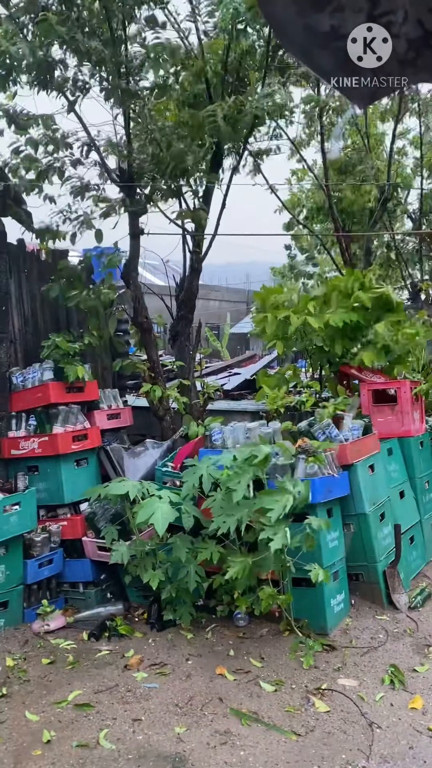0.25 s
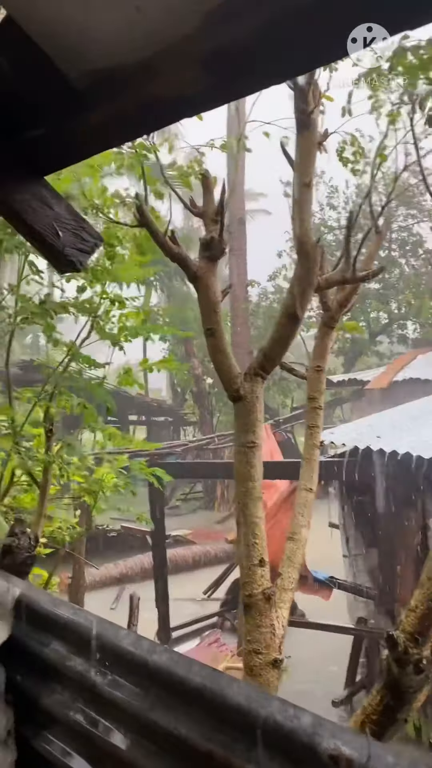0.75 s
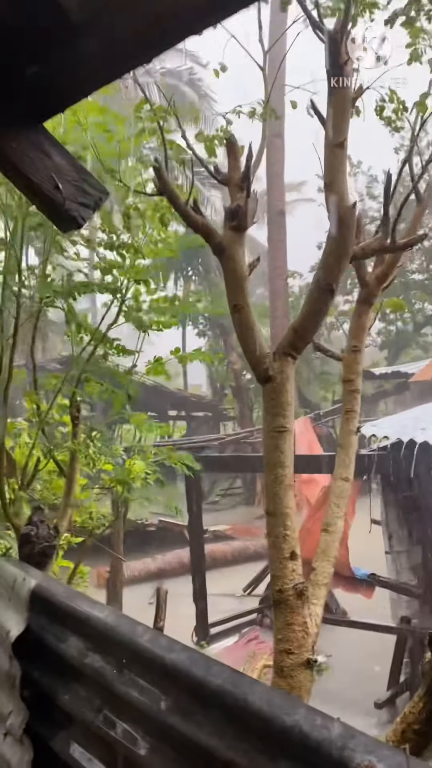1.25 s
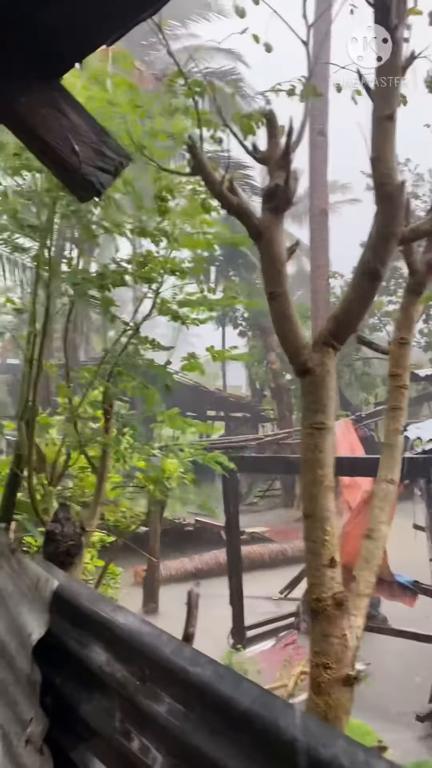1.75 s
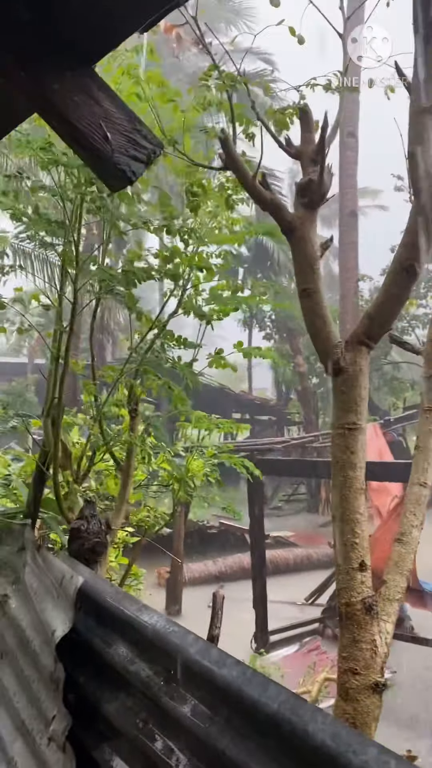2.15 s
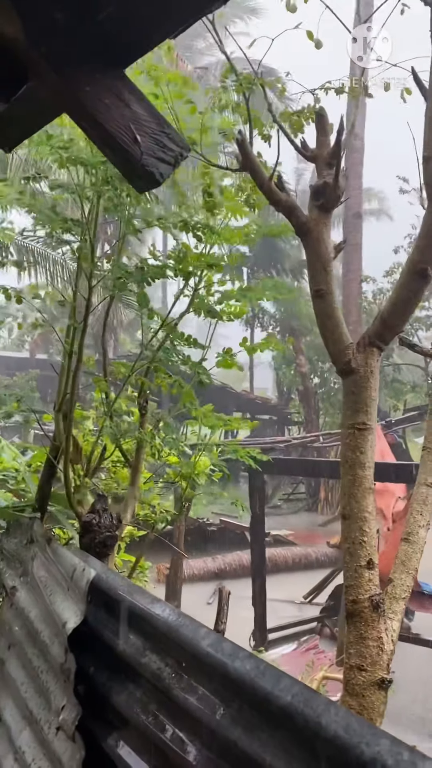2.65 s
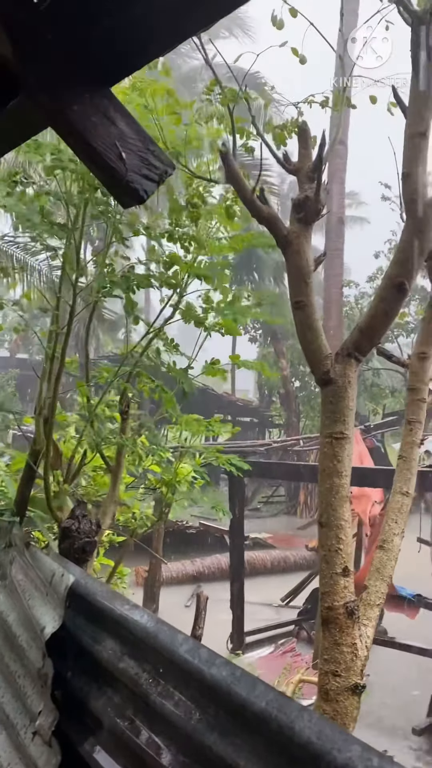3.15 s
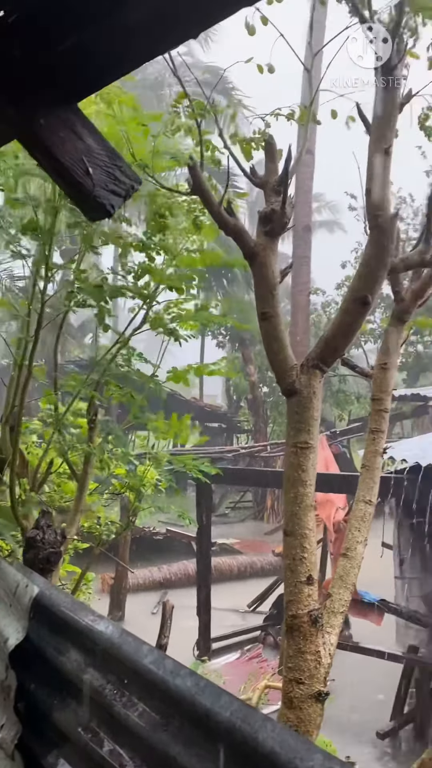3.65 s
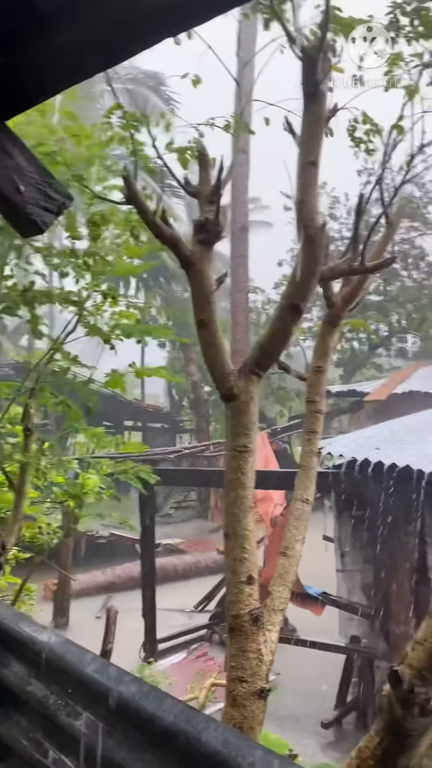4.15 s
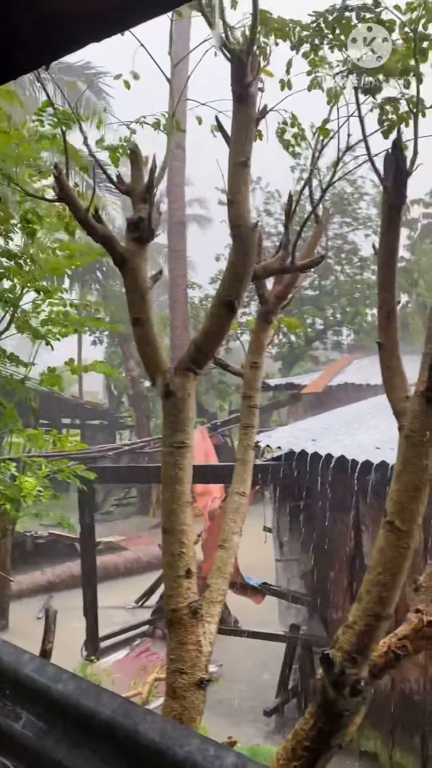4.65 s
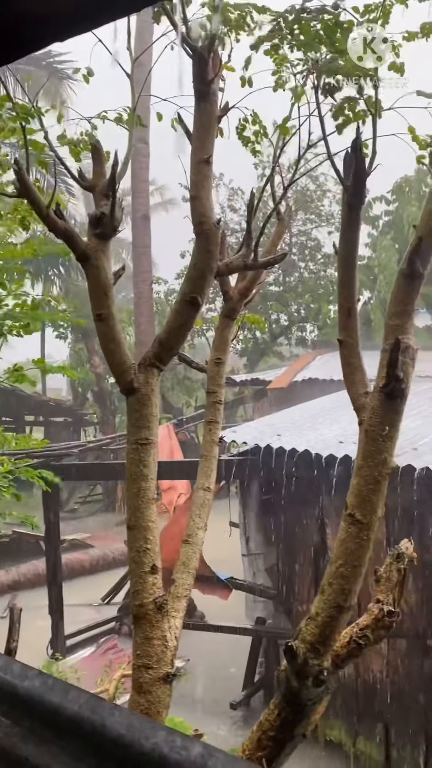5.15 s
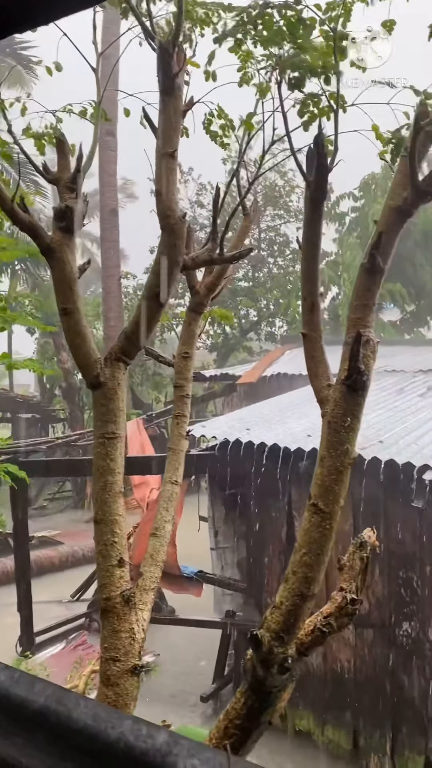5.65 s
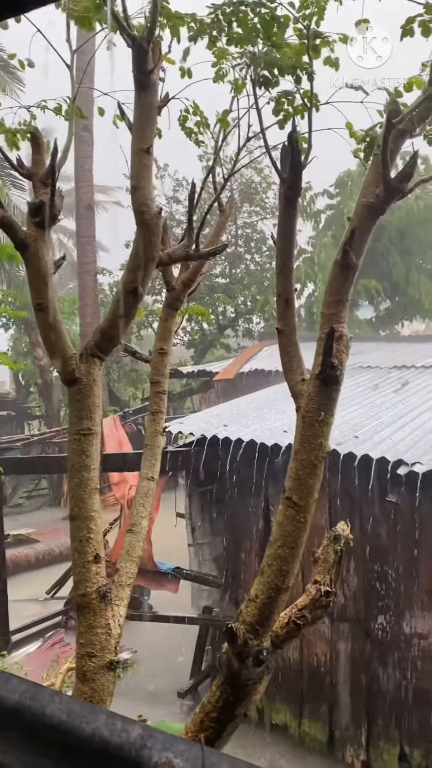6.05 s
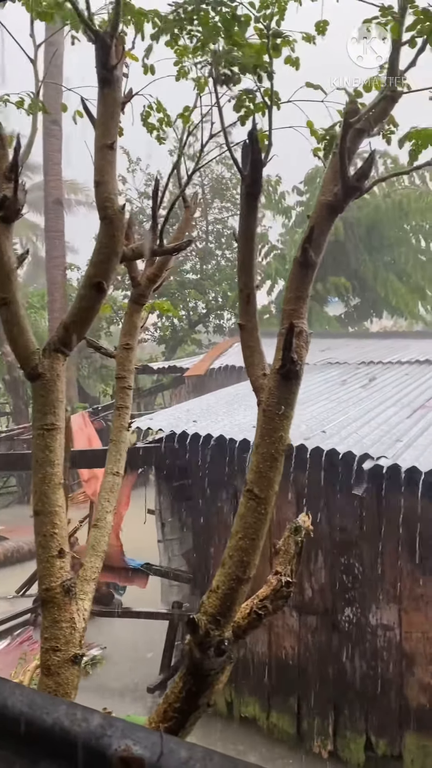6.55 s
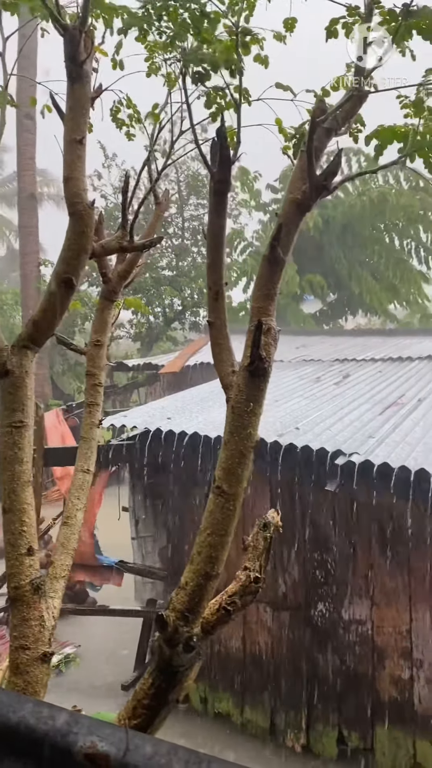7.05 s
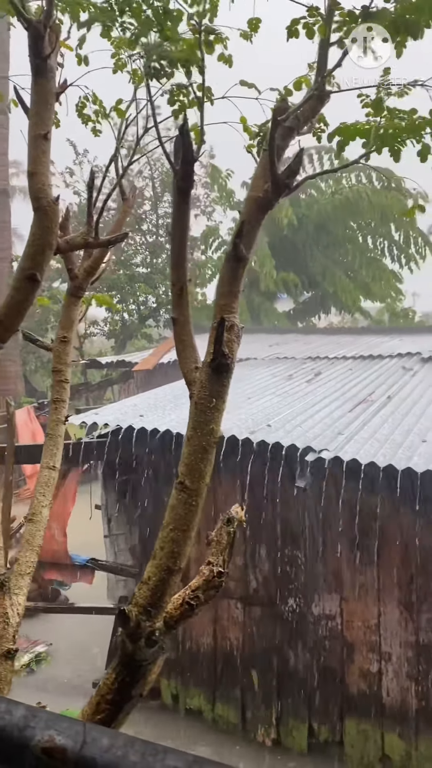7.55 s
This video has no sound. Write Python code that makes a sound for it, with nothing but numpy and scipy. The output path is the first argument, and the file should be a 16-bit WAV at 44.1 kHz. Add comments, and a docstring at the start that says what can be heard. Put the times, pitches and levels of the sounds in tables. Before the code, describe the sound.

A brief wind gust slaps the microphone, then heavy rain drums steadily on corrugated metal roofs, with close drips and light wind bumps.

```python
"""Heavy rain on corrugated metal roofs, heard from under an eave through two close microphone openings.
First a gust shakes and slaps the microphone. The sound drops out for a moment, then the downpour fades
in: countless drops drum on the metal sheets and make them ring, while near ones tick and splash.
Lighter gusts bump the microphone now and then. Near the end, water from the eave plops into a puddle,
where trapped bubbles ring."""
import sys
import numpy as np
from scipy import signal
from scipy.fft import rfft, irfft, next_fast_len
from scipy.io import wavfile
from scipy.ndimage import uniform_filter1d

SR = 44100
rng = np.random.default_rng(int(sys.argv[2]) if len(sys.argv) > 2 else 0)


def waveform_to_disk(signal):
    """Save audio, clipped to [-1, 1], as 16-bit WAV at the path in sys.argv[1]."""
    frames = np.transpose(np.atleast_2d(signal))
    scaled = np.clip(frames, -1, 1) * 32767
    samples = np.round(scaled).astype(np.int16)
    wavfile.write(sys.argv[1], SR, samples)


N = 343098
FFT_SIZE = next_fast_len(N, real=True)
TIME, HZ = np.arange(N) / SR, np.fft.rfftfreq(FFT_SIZE, 1 / SR)


def gain_of(db):
    """Turns decibels into a number to multiply by."""
    return 10 ** (np.asarray(db) / 20)


def evened(x):
    """Scales a sound to an average strength (rms) of 1."""
    return x / np.sqrt(np.mean(x ** 2) + 1e-20)


def curve(table, column=1):
    """Joins the points of a table to give a value for every frequency."""
    columns = np.transpose(table)
    return np.interp(np.log(HZ + 1), np.log(columns[0] + 1), columns[column])


def filtered(x, gain):
    """Turns each frequency up or down by its own gain."""
    return irfft(rfft(x, FFT_SIZE) * gain, FFT_SIZE)[..., :N]


def noise(tone):
    """Noise of strength 1, shaped by a table of frequencies and levels."""
    return evened(filtered(rng.standard_normal(N), gain_of(curve(tone))))


def swell(s, half_s):
    """A smooth rise and fall of height 1 around a time."""
    return np.exp(-((TIME - s) / half_s) ** 2)


def add(mix, s, sound):
    """Mixes a sound in at a time."""
    part = mix[max(round(s * SR), 0):][:len(sound)]
    part += sound[:len(part)]


def eddies(tone, smooth_s):
    """Swirling air: noise with its strength partly levelled, so that a push swells it smoothly."""
    swirl = noise(tone)
    power = filtered(swirl ** 2, np.exp(-(np.pi * HZ * smooth_s) ** 2))
    return evened(swirl / np.sqrt(abs(power) + 0.15))


# pushes of the first gust: (time [s], rumble level [dB], rasp level [dB], half length [s])
PUSHES = [(0.0, -21, -26, 0.0093), (0.048, -31, -27, 0.0089), (0.07, -15, -23, 0.019),
          (0.091, -26, -17, 0.011), (0.119, -19, -26.5, 0.02), (0.169, -36, -20.5, 0.01),
          (0.202, -23, -19.5, 0.019)]
def wind_strength(steady_db, column):
    """Each push swells and dies over a steady flow; the column picks rumble or rasp."""
    return gain_of(steady_db) + sum(gain_of(push[column]) * swell(push[0], push[-1]) for push in PUSHES)


# how alike the left and right channels sound at each frequency, and how far the left leads:
# (frequency [Hz], likeness [0-1], head start of the left [radians])
LIKENESS = [(50, 0.85, 0), (160, 0.76, 0), (300, 0.92, 0), (700, 0.78, -0.1), (1300, 0.87, 0),
            (2000, 0.85, 0.1), (2700, 0.55, 0.9), (4200, 0.52, 0.95), (5000, 0.6, 0.25), (5600, 0.68, 0.65),
            (6400, 0.68, 2.1), (7400, 0.88, 3.14), (10300, 0.78, 6.28), (13500, 0.85, 9.42),
            (15700, 0.55, 12.1)]
# how much louder the left channel is: (frequency [Hz], left minus right [dB])
BALANCE = [(60, 2.5), (150, -0.5), (380, -1.0), (950, -1.5), (2380, -0.5), (5980, 0), (15000, 0.5)]
def two_channels(direct, left, right):
    """Both channels share the direct sound, one a little ahead; scattered sound differs in each."""
    likeness, head_start = curve(LIKENESS), curve(LIKENESS, column=2)
    side = np.array([[0.5], [-0.5]])
    shared = np.sqrt(likeness) * rfft(direct, FFT_SIZE) * np.exp(1j * side * head_start)
    scattered = np.sqrt(1 - likeness) * rfft([left, right], FFT_SIZE)
    return irfft((shared + scattered) * gain_of(side * curve(BALANCE)), FFT_SIZE)[:, :N]


# the wind's deep rumble: (frequency [Hz], relative level [dB])
RUMBLE_TONE = [(15, -11.5), (50, 3), (100, -1.5), (170, -5), (300, -14), (1000, -68)]
# the wind's throaty rasp: (frequency [Hz], relative level [dB])
RASP_TONE = [(60, -27), (150, -9), (230, -0.5), (380, 0.5), (520, -4), (750, -7), (1300, -23.5),
             (2500, -36), (8000, -63)]
# the steady hiss of the air: (frequency [Hz], relative level [dB])
AIR_TONE = [(100, -16), (1000, 2), (2500, -0.5), (5000, -6), (10000, -10), (15500, -16)]
def first_gust(air_db=-35, apart_hz=1000):
    """Wind hits the microphone: one rumble on both sides, a rasp that differs, and a hiss behind."""
    difference = filtered(noise(RASP_TONE), HZ ** 2 / (HZ ** 2 + apart_hz ** 2))
    rumble = eddies(RUMBLE_TONE, smooth_s=0.0077) * wind_strength(steady_db=-22.5, column=1)
    rasp = eddies(RASP_TONE, smooth_s=0.008) + np.array([difference, -difference])
    rasp *= wind_strength(steady_db=-31, column=2)
    hiss = two_channels(noise(AIR_TONE), noise(AIR_TONE), noise(AIR_TONE))
    return rumble + rasp + gain_of(air_db) * hiss


def puff(hz, octaves, decay_s):
    """A short burst of noise around one pitch, with a peak of 1."""
    t = np.arange(4096) / SR
    octaves_away = np.log2((np.fft.rfftfreq(len(t), 1 / SR) + 1) / hz)
    band = np.exp(-(octaves_away / octaves) ** 2)
    burst = irfft(rfft(rng.standard_normal(len(t))) * band) * np.sqrt(t) * np.exp(-t / decay_s)
    return burst / abs(burst).max()


# slaps of air in the first gust: (time [s], peak level [dB], pitch [Hz])
AIR_SLAPS = [(0.0563, -12.5, 750), (0.066, -11, 75), (0.0857, -20, 1190), (0.111, -13.5, 650),
             (0.13, -17, 600), (0.1585, -18, 545), (0.201, -14.5, 900)]
def slaps(swings=1.7):
    """A swirl of air hits the microphone with a brief puff: small ones slap, a large one thuds."""
    out = np.zeros(N)
    for s, db, hz in AIR_SLAPS:
        add(out, s, gain_of(db) * puff(hz, octaves=0.73, decay_s=swings / hz))
    return out


def impacts(per_s, spread_db):
    """Drops land at random, one click each: most are small, a few large."""
    when, chance, sign = rng.random((int(per_s * N / SR), 3)).T
    size = gain_of(spread_db * np.minimum(-np.log(1 - chance), 5))
    return evened(np.bincount((when * N).astype(int), size * np.sign(sign - 0.5), N))


def splashes(spots=10, burst_s=0.0015):
    """Near drops burst into a millisecond or so of spray; each spot sounds a little different."""
    t, out = np.arange(SR // 100) / SR, np.zeros(N)
    for _ in range(spots):
        spray = evened(rng.standard_normal(len(t)) * np.exp(-t / burst_s))
        out += signal.oaconvolve(impacts(per_s=150, spread_db=2.0), spray)[:N]
    return evened(out)


def patchy(x, depth_db=1.05):
    """Rain shifts over the roof, so patches of sound about 700 Hz wide and 80 ms long rise and fall."""
    spectra = signal.stft(x, nperseg=512)[2]
    patches = uniform_filter1d(rng.standard_normal(spectra.shape), size=8, axis=0)  # blur in pitch
    patches = evened(uniform_filter1d(patches, size=14, axis=1))  # blur in time
    return signal.istft(spectra * gain_of(depth_db * patches), nperseg=512)[1][:N]


# the notes of a roof sheet: (pitch [Hz], relative energy [dB], time to fade by 60 dB [s])
ROOF_NOTES = [(126, -7.5, 0.037), (230.4, -14, 0.51), (286.4, -9.5, 0.064), (331, -7.5, 0.055),
              (544, -5, 0.039), (700, -12.5, 0.063), (799, 2, 0.028), (1420, -1, 0.035), (1586, -3, 0.035),
              (1944, -6, 0.042), (2360, -7.5, 0.026), (2980, -13, 0.039)]
def roof_ring(sheets=3, detune=0.023):
    """Drops ring several metal sheets, each tuned a little differently."""
    t, out = np.arange(SR // 6) / SR, np.zeros(N)
    for _ in range(sheets):
        tunings = 1 + detune * rng.uniform(-1.3, 1, len(ROOF_NOTES))
        ring = sum(gain_of(db - 60 * t / fade_s) / np.sqrt(fade_s) * np.sin(2 * np.pi * hz * tuning * t)
                   for (hz, db, fade_s), tuning in zip(ROOF_NOTES, tunings))
        out += signal.oaconvolve(impacts(per_s=1000, spread_db=1.7), ring)[:N]
    return evened(out)


# the low and middle sound of the drops: (frequency [Hz], relative level [dB])
PATTER_TONE = [(22, -50), (45, -26), (70, -5.5), (115, -2), (190, -5.5), (380, -4), (520, -0.5),
               (1000, 0.5), (1550, -2), (1820, -4), (2550, -6), (3700, -11)]
# the high spray of bursting drops: (frequency [Hz], relative level [dB])
SPRAY_TONE = [(5200, -12.2), (7000, -15.4), (9000, -16.8), (12300, -18), (15500, -20)]
def downpour(splash_db, ring_db):
    """A dense patter of far drops, nearer splashes, and the ring of the metal."""
    far = impacts(per_s=14000, spread_db=1.8)
    drops = patchy(far + gain_of(splash_db) * splashes())
    patter = evened(filtered(drops, gain_of(curve(PATTER_TONE + SPRAY_TONE))))
    return evened(patter + gain_of(ring_db) * roof_ring())


def drift(rate_hz):
    """A random wobble of strength 1, mostly slower than the given rate."""
    return evened(filtered(rng.standard_normal(N), (HZ > 1) / (1 + (HZ / rate_hz) ** 2)))


# how the rain eases and builds: (time [s], change in roar [dB], change in hiss [dB])
RAIN_STRENGTH = [(0.65, 0, 0.1), (1.35, -1, 0.2), (1.95, -0.7, -0.4), (3.3, -1.5, -0.1), (3.8, -1.6, -0.3),
                 (4.62, 0.5, 0.6), (4.97, -0.3, 0.3), (5.33, 0, 0.5), (5.7, -0.5, 0), (6.45, -0.5, 0),
                 (7.05, -0.1, 0.9), (7.75, -0.2, 0.2)]
def rain(roar_db=-23, hiss_db=-23.5, surge_db=0.27, flutter_db=0.5, roar_hz=1900, spray_hz=4000):
    """The roofs' roar and sizzle surge together; the fine spray on top also flutters alone."""
    direct = downpour(splash_db=-9, ring_db=-9)
    left, right = (downpour(splash_db=-7, ring_db=-5.5) for _ in range(2))
    stereo = two_channels(direct, left, right)
    roar = filtered(stereo, 1 / (1 + (HZ / roar_hz) ** 4))
    spray = filtered(stereo, 1 - 1 / (1 + (HZ / spray_hz) ** 4))
    sizzle = stereo - roar - spray
    hiss = sizzle + spray * gain_of(flutter_db * drift(rate_hz=22))
    times, roar_change, hiss_change = np.transpose(RAIN_STRENGTH)
    roar *= gain_of(roar_db + np.interp(TIME, times, roar_change))
    hiss *= gain_of(hiss_db + np.interp(TIME, times, hiss_change))
    return (roar + hiss) * gain_of(surge_db * drift(rate_hz=11))


# waves of heavier rain: (time [s], level [dB], half length [s], pitch [Hz], pitch spread [Hz])
RAIN_WAVES = [(0.95, -37, 0.55, 1570, 170), (1.23, -32, 0.05, 2490, 900), (1.65, -43, 0.5, 2950, 90),
              (2.486, -33, 0.035, 2500, 820), (3.732, -35, 0.05, 2400, 900), (4.65, -35.5, 0.8, 1410, 150),
              (6.75, -35.5, 1.25, 1460, 210), (6.737, -37, 0.03, 2500, 800), (7.0, -35.5, 0.29, 660, 150)]
def sweeps():
    """Heavier rain sweeps over one roof, whose ring swells and sinks back into the roar."""
    out = np.zeros(N)
    for s, db, half_s, hz, width_hz in RAIN_WAVES:
        ring = 1 / (1 + 1j * (HZ - hz) / width_hz) ** 2
        drumming = evened(filtered(impacts(per_s=1000, spread_db=0.5), ring))
        out += gain_of(db) * swell(s, half_s) * drumming
    return out


# single drops close by: (time [s], peak of the snap [dB], peak of the spray [dB])
NEAR_DROPS = [(0.7285, -24, -35), (0.9735, -28, -38), (1.2235, -22, -30), (1.3505, -36, -26),
              (1.4215, -34, -30), (2.1645, -34, -29), (2.6455, -27, -31), (2.877, -36, -30),
              (3.6055, -27, -27), (3.747, -26, -43), (5.981, -23, -29)]
def ticks(snap_hz=3200, spray_hz=10000, octaves=0.42, decay_s=0.0033):
    """Fat drops snap on the nearest sheet, or burst into a bright spray."""
    out = np.zeros(N)
    for s, snap_db, spray_db in NEAR_DROPS:
        add(out, s, gain_of(snap_db) * puff(snap_hz, octaves, decay_s))
        add(out, s, gain_of(spray_db) * puff(spray_hz, octaves, decay_s))
    return out


# the rumble of a light gust: (frequency [times the gust's pitch], relative level [dB])
GUST_TONE = [(0.25, -30), (0.55, -17), (0.9, 5.5), (1.4, -6), (2.3, -12), (3.6, -25), (8, -46), (30, -80)]
# gusts during the rain: (time [s], level [dB], half length [s], pitch [Hz])
LIGHT_GUSTS = [(1.624, -37, 0.035, 57.7), (2.743, -36, 0.053, 70), (3.0, -39.5, 0.66, 85),
               (4.45, -35, 0.039, 75), (4.71, -37, 0.08, 75), (4.932, -24, 0.013, 100),
               (4.966, -23, 0.015, 75), (5.008, -23.5, 0.037, 60), (5.95, -28.5, 0.014, 110),
               (5.984, -27, 0.029, 64), (6.128, -30, 0.032, 135), (6.148, -22.5, 0.017, 80),
               (6.2, -36, 0.1, 75), (6.244, -27, 0.028, 74), (6.353, -31, 0.022, 70)]
def light_gusts(breeze_db=-46, breeze_hz=60):
    """Wind reaches under the eave, over a soft breeze; small swirls sound higher than large ones."""
    out = gain_of(breeze_db) * noise(np.multiply(GUST_TONE, [breeze_hz, 1]))
    for s, db, half_s, hz in LIGHT_GUSTS:
        rumble = eddies(np.multiply(GUST_TONE, [hz, 1]), smooth_s=0.0098)
        out += gain_of(db) * swell(s, half_s) * rumble
    return out


# water falling from the eave into a puddle: (time [s], level [dB], first pitch [Hz], last pitch [Hz])
EAVE_DRIPS = [(6.868, -23, 772, 788), (6.903, -18, 632, 810), (6.931, -22, 815, 860)]
def plops(rise_s=0.021, attack_s=0.0018, fade_s=0.21):
    """A trapped bubble rings and rises in pitch as it nears the surface."""
    t, out = np.arange(SR // 4) / SR, np.zeros(N)
    for s, db, start_hz, end_hz in EAVE_DRIPS:
        hz = end_hz + (start_hz - end_hz) * np.exp(-t / rise_s)
        loudness = gain_of(db - 60 * t / fade_s) * (1 - np.exp(-t / attack_s))
        add(out, s, loudness * np.sin(2 * np.pi * np.cumsum(hz) / SR))
    return out


def microphone(x, low_hz=30):
    """The microphone loses the deepest bass."""
    return signal.sosfilt(signal.butter(2, low_hz, "high", fs=SR, output="sos"), x)


def scene(wind_stop_s=0.2182, fade_out_s=0.015, rain_start_s=0.33, fade_in_s=0.205):
    """The first gust stops short; then the rain fades in with its near drops, gusts and plops."""
    fade_out = gain_of(-60 * np.maximum(TIME - wind_stop_s, 0) / fade_out_s)
    fade_in = np.sin(np.pi / 2 * np.clip((TIME - rain_start_s) / fade_in_s, 0, 1)) ** 2
    wind = microphone(first_gust() + slaps())
    storm = microphone(rain() + sweeps() + ticks() + light_gusts() + plops())
    return fade_out * wind + fade_in * storm


def record(dry):
    """Cuts off the very highest treble, above 15800 Hz."""
    treble_cut = signal.firwin(511, 15800, window=("kaiser", 9), fs=SR)
    return signal.oaconvolve(dry, treble_cut[None], "same")


dry = scene()
out = record(dry)
waveform_to_disk(out)
```